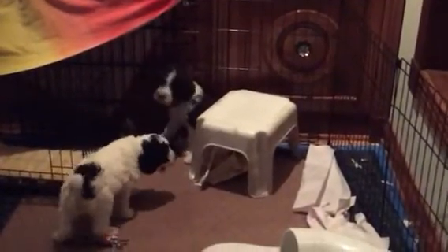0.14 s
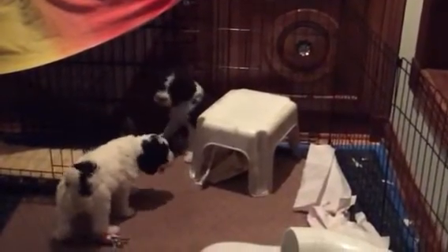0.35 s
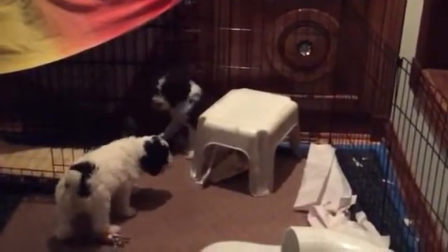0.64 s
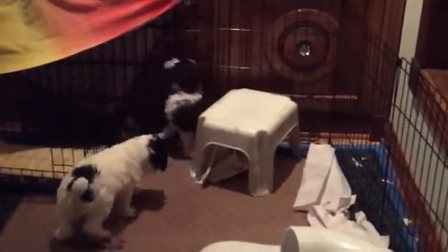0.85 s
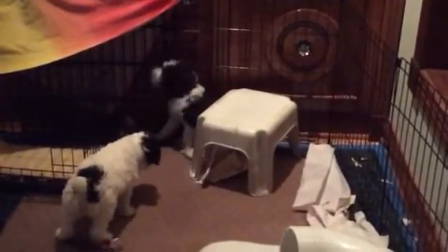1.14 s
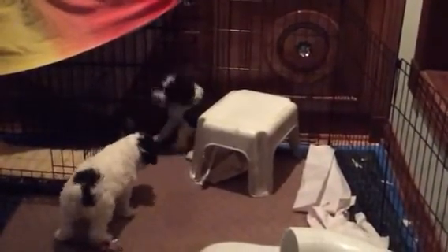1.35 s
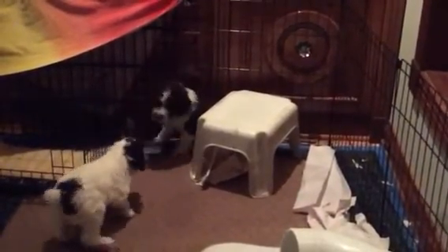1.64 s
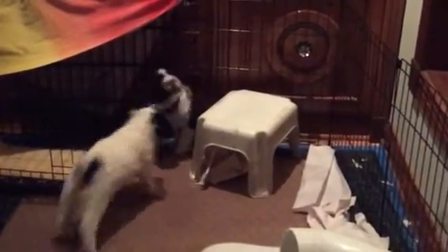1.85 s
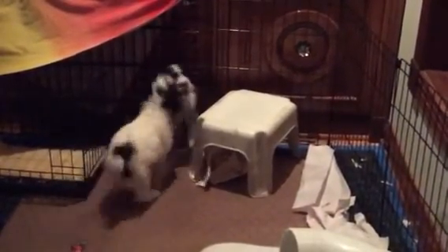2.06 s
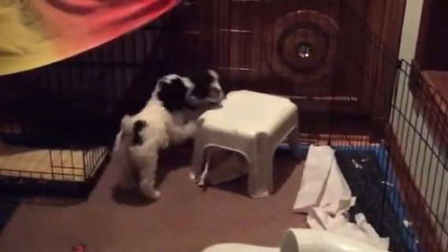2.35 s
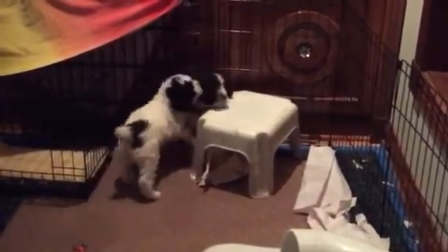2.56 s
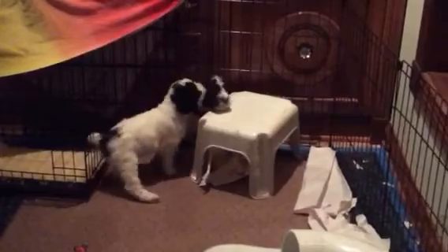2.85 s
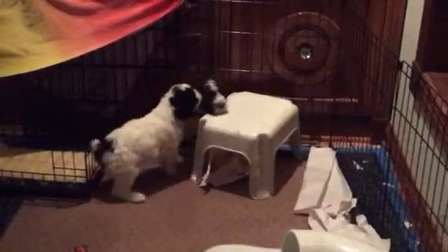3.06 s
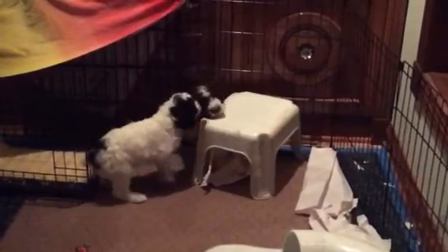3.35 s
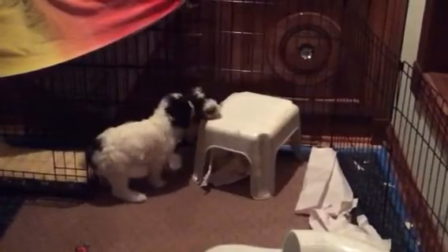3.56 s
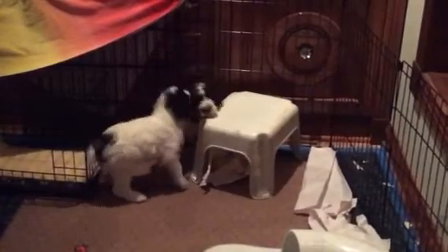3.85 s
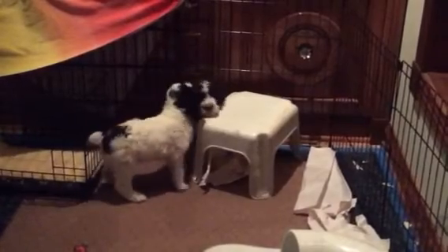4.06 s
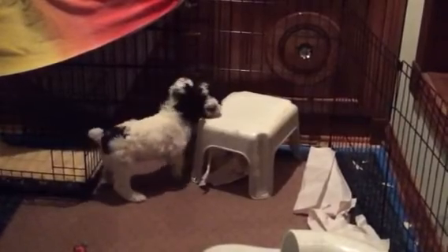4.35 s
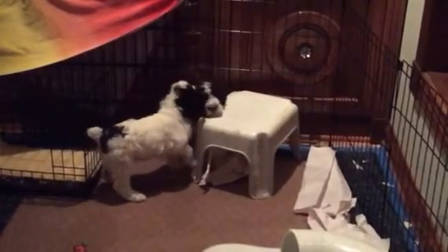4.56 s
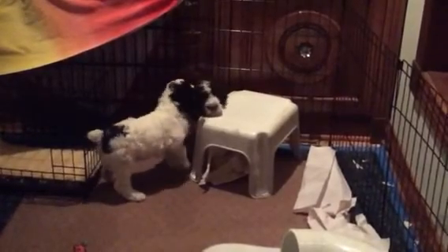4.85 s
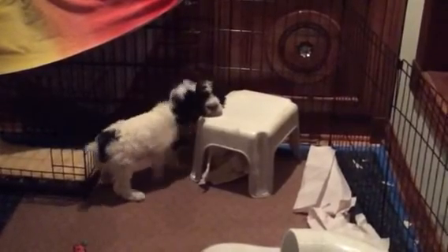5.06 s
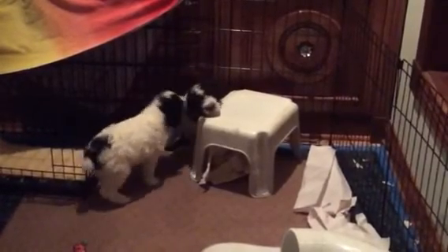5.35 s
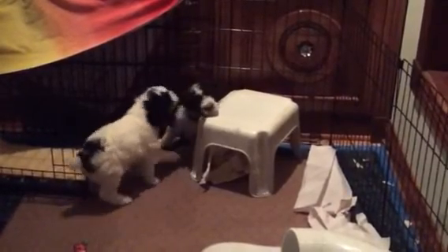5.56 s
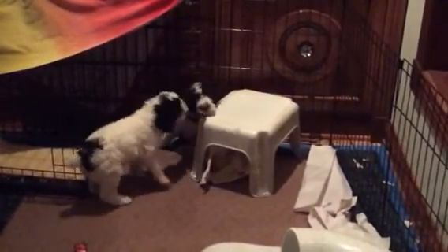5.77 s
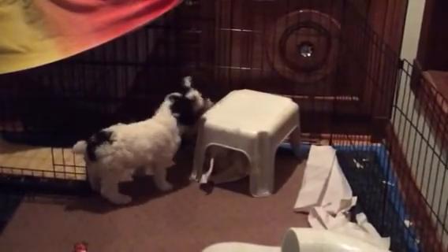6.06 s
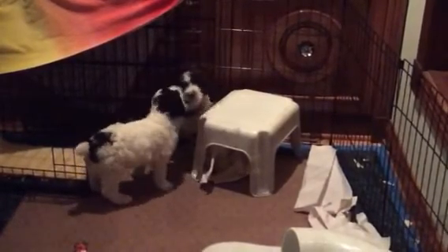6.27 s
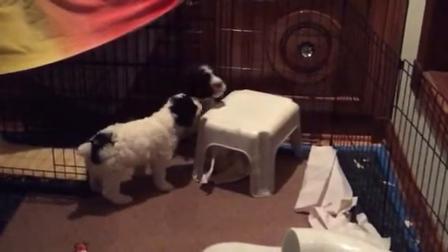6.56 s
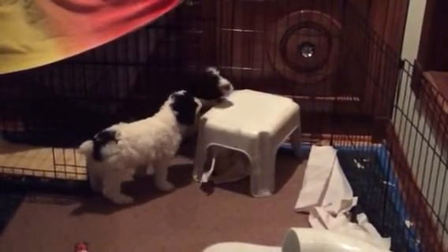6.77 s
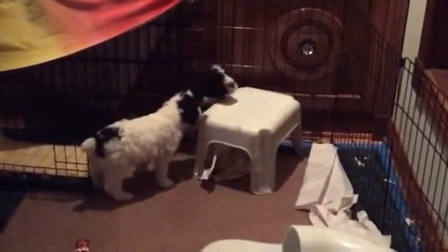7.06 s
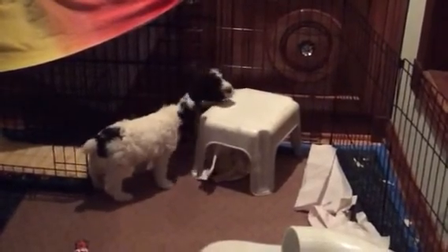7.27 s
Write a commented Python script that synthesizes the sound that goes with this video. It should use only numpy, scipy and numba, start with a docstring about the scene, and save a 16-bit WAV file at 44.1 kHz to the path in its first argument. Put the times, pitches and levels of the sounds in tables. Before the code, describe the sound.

A quiet living room with soft air noise and very faint mains hum. A tiny ring of pen wire and light claw ticks open the scene. At about 0.7 s a puppy gives a snarling bark of roughly 0.3 s, high and clear at first, then falling and turning ragged. Faint squeaky whimpers follow near 1.4-1.6 s. Claws tick, paws thump softly and fur brushes the mat from 1.7 s, with a grunt at 2.1 s and a short, rough, open-mouthed yap at 2.25 s running into a growl. Low fluttering growls come at 3.0, 3.5 and 4.1 s, with soft paw thumps near 3.9 s. Small grunts continue from 4.5 s, a faint whine at 5 s, a growl at 5.3 s. Brushing and another whine surround 6 s; growls return at 6.4 s and at the end near 7.4 s. Short indoor echo throughout.

```python
"""Two small puppies play in a wire pen in a living room; the microphone hears a quiet background throughout.
Claw ticks (noise bursts) and a long snarling bark come early; ticks, faint whimpers (gliding tones)
and faint ringing of the pen wire are scattered throughout. Short grunts, mat brushing and soft paw thumps
follow the bark; a sharp yap leads into low growls. Barks are fold pulses through mouth resonances; grunts and
growls are slow, uneven fold flaps that ring throat and half-open mouth. A short room echo carries them."""
import sys
import numpy as np
from scipy import signal
from scipy.fft import rfft, irfft, next_fast_len
from scipy.io import wavfile
from scipy.ndimage import uniform_filter1d
from numba import njit

SR = 44100
rng = np.random.default_rng(int(sys.argv[2]) if len(sys.argv) > 2 else 0)


def to_wav(s):
    """Save 16-bit WAV."""
    ch = np.atleast_2d(s).T  # columns
    pcm = np.round(np.clip(ch, -1, 1) * 32767)  # PCM
    wavfile.write(sys.argv[1], SR, pcm.astype(np.int16))


N = 327206
T = np.arange(N) / SR


def amp(db):
    """Decibels to gain."""
    return 10 ** (np.asarray(db) / 20)


def unit(x):
    """Scale to rms 1."""
    return x / np.sqrt(np.mean(x ** 2) + 1e-20)


def even(x, span_s):
    """Hold the running rms near 1."""
    size = max(int(span_s * SR), 2)
    power = uniform_filter1d(uniform_filter1d(x ** 2, size), size)
    return x / np.sqrt(np.abs(power) + 1e-20)


def follow(rows, t):
    """The columns of a curve at times t."""
    s, *columns = np.transpose(rows)
    return [np.interp(t, s, c) for c in columns]


def gate(t, attack_s, release_s):
    """Open over the attack, hold, close over the release."""
    return np.clip(np.minimum((t - t[0]) / attack_s, (t[-1] - t) / release_s), 0, 1)


def add(out, start_s, x):
    """Mix a sound in at its start time."""
    i = int(start_s * SR)
    x, i = x[max(-i, 0):], max(i, 0)
    out[i:i + len(x)] += x[:max(N - i, 0)]


def filtered(x, order, hz, kind="low"):
    """Butterworth low- or high-pass."""
    return signal.sosfilt(signal.butter(order, hz, kind, fs=SR, output="sos"), x)


def resonate(x, hz, width_hz):
    """Band-pass with gain 1 at the centre."""
    return signal.lfilter(*signal.iirpeak(min(hz, .45 * SR), hz / width_hz, fs=SR), x)


def tract(x, modes):
    """Parallel resonances, each passed twice for steep skirts."""
    return sum(amp(db) * resonate(resonate(x, hz, w), hz, w) for hz, w, db in modes)


@njit
def glide(x, hz, width_hz):
    """Band-pass whose centre moves."""
    y, band, low = np.empty(len(x)), 0., 0.
    for i in range(len(x)):
        g, k = np.tan(np.pi * hz[i] / SR), width_hz / hz[i]
        v = (band + g * (x[i] - low)) / (1 + g * (g + k))
        band, low, y[i] = 2 * v - band, low + 2 * g * v, k * v
    return y


def noise(colour):
    """Noise of rms 1 with a (f/Hz, level/dB) spectrum."""
    hz, db = np.transpose(colour)
    n = next_fast_len(N, True)
    gain = amp(np.interp(np.log(np.fft.rfftfreq(n, 1 / SR) + 1), np.log(hz), db))
    return unit(irfft(rfft(rng.standard_normal(n)) * gain, n)[:N])


# quiet air in the living room, spectrum shape: (f/Hz, level/dB)
HUSH = [(15, -55), (25, -26.5), (69, -8.5), (148, -11), (173, 1.5), (209, -15), (240, -0.5), (305, -14.5),
        (368, -11.5), (567, -16.5), (804, -18.5), (1340, -19), (1800, -23.5), (2300, -26), (15500, -31)]
HUSH_DB = -68
# mains hum, peak level: (f/Hz, level/dB)
HUM = [(120, -78.5), (240, -82.5)]


def background():
    """Still room air as coloured noise, with a faint mains hum of steady sines."""
    hum = sum(amp(db) * np.sin(2 * np.pi * hz * T) for hz, db in HUM)
    return amp(HUSH_DB) * noise(HUSH) + hum


# faint tones in the pen, rms ahead of the room; the wire rings near 2.1 kHz, the whimpers lie lower:
# (t/s, length/s, start f/Hz, end f/Hz, level/dB)
FAINT_TONES = [(0, 0.044, 2137, 2090, -68), (1.369, 0.076, 1850, 1735, -77),
               (1.534, 0.058, 1814, 1830, -77.5), (3.27, 0.052, 2150, 2070, -73),
               (4.946, 0.034, 1030, 1020, -67), (4.965, 0.15, 930, 864, -72.5),
               (5.98, 0.142, 950, 902, -73), (6.108, 0.12, 2060, 2070, -69.5)]
WIRE_FROM_HZ = 2000  # tones that start above this are the wire


def wavering_tones(rows, waver=0.058, flutter_db=4):
    """Thin gliding tones, uneven in pitch and level."""
    out = np.zeros(N)
    for s, length, start_hz, end_hz, db in rows:
        u = np.linspace(0, 1, int(length * SR))
        slow = uniform_filter1d(rng.standard_normal((2, SR // 2)), size=130)
        wobble, flutter = unit(slow)[:, :len(u)]
        hz = (start_hz + (end_hz - start_hz) * u) * (1 + waver * wobble)
        swell = np.sqrt(np.abs(np.sin(np.pi * u))) * amp(flutter_db * flutter)
        add(out, s, amp(db) * unit(swell * np.sin(2 * np.pi * np.cumsum(hz) / SR)))
    return out


def wire_ringing():
    """Faint ringing of the pen wire, as short wavering tones near 2.1 kHz."""
    return wavering_tones([row for row in FAINT_TONES if row[2] > WIRE_FROM_HZ])


# claws and teeth on mat, stool and wire, ahead of the contact envelope: (t/s, treble level/dB, body level/dB)
TAPS = [(.003, -68.5, -57), (0.55, -61.5, -88), (0.901, -46.5, -70), (1.044, -48.5, -78), (1.762, -65, -68),
        (1.806, -58.5, -70), (1.888, -69, -55), (2.008, -53, -55), (2.179, -50.5, -44),
        (2.184, -51.5, -46.5), (2.395, -49.5, -64), (2.418, -67, -49), (2.798, -76.5, -60),
        (3.83, -84, -73), (3.914, -81, -66), (3.972, -73, -57.5), (5.651, -79, -67), (5.853, -64, -58.5),
        (6.151, -75, -58), (6.685, -62.5, -64)]


def ticks(tick_s=.008, body_s=0.0058):
    """Claws and teeth tick: treble and body noise bands, each with its own decay."""
    out, t = np.zeros(N), T[:SR // 10]
    for s, treble_db, body_db in TAPS:
        tick = unit(tract(rng.standard_normal(len(t)), [(4200, 2000, -1), (10600, 14000, 0)]))
        body = unit(tract(rng.standard_normal(len(t)), [(1240, 1600, 0), (3330, 1100, -2.0)]))
        contact = 1.51 * (1 - np.exp(-t / 0.002))  # the claw bites in, then scrapes briefly
        treble = amp(treble_db) * tick * np.exp(-t / tick_s)
        add(out, s, contact * (treble + amp(body_db) * body * np.exp(-t / body_s)))
    return out


def folds(hz, jitter, scatter_db, limp):
    """Vocal fold pulses of uneven spacing and size, limping in threes; also the time since the last one."""
    n = len(hz)
    pulses, age, at = np.zeros(n + 1), np.zeros(n), 0.
    for k, (late, loud) in enumerate(np.clip(rng.standard_normal((n // 40, 2)), -2, 2)):
        i = int(at)
        if i >= n:
            break
        size = amp(scatter_db[i] * loud) * (1 + limp[i] * np.cos(2 * np.pi * k / 3))
        pulses[i:i + 2] += size * np.array([1 - at + i, at - i])  # placed between two samples
        age[i:] = T[:n - i]
        at += SR / hz[i] * np.exp(jitter[i] * late)
    return pulses[:n], age


def rasp(pulses, puff_s):
    """A puff of turbulent air after each pulse, of the same energy as the pulse."""
    keep = np.exp(-1 / (puff_s * SR))
    puffs = signal.lfilter([np.sqrt(1 - keep ** 2)], [1, -keep], pulses)
    return puffs * rng.standard_normal(len(pulses))


FOLD_SCATTER_DB = 4.5  # at full roughness
# the gap under the fundamental: its place as a share of the pitch, and its width
DARK_SHARE, DARK_WIDTH_HZ = .56, 170
BARK_ATTACK_S, BARK_RELEASE_S = .015, .006


def bark(effort, pitch, mouth, jitter, air, lip_db, lip_width_hz, hiss_db, bright_hz):
    """A pressed voice of varying roughness rings fixed mouth modes and a moving lip resonance."""
    t = T[int(effort[0][0] * SR):int(effort[-1][0] * SR)]
    db, bright_db = follow(effort, t)
    hz, rough, lip_hz = follow(pitch, t)
    pulses, _ = folds(hz, jitter * rough, FOLD_SCATTER_DB * rough, np.clip(.8 * rough, 0, .55))
    puffs = filtered(rasp(pulses, 0.00049), 1, 900, "high")
    source = pulses + air * rough * puffs
    # dark under a clear voice
    source = source - (1 - rough ** 2) * glide(source, DARK_SHARE * hz, float(DARK_WIDTH_HZ))
    lips = glide(glide(source, lip_hz, float(lip_width_hz)), lip_hz, float(lip_width_hz))
    voice = filtered(tract(source, mouth) + amp(lip_db) * lips, 8, 5600)
    low = signal.sosfiltfilt(signal.butter(2, bright_hz, fs=SR, output="sos"), voice)
    voice = even(low + amp(bright_db) * (voice - low), 0.0043)
    hiss = unit(tract(rasp(pulses, .006), [(12000, 3700, 0)]))  # air through the teeth
    out = np.zeros(N)
    envelope = gate(t, BARK_ATTACK_S, BARK_RELEASE_S) * amp(db)
    add(out, t[0], envelope * (voice + amp(hiss_db) * hiss))
    return out


# snarling bark, voice: (t/s, pitch f/Hz, roughness 0-1, lip resonance f/Hz)
SNARL_PITCH = [(.73, 345.5, 0.22, 3100), (.772, 429.5, 0.25, 3050), (.797, 402.1, 0.19, 1960),
               (.825, 358.9, 0.21, 2000), (.88, 310.2, 0.63, 1850), (.975, 274.4, 0.82, 1950),
               (1.018, 213.8, .85, 1880)]
# snarling bark, effort ahead of the pen balance: (t/s, level/dB, brightness/dB)
SNARL = [(.734, -39.5, -12), (.768, -33.5, 8), (.81, -31, 5), (.823, -24.5, 6.5), (.845, -33, 3.5),
         (.9, -34.5, 2), (.995, -34, -3), (1.015, -57, 0), (1.055, -56, -18)]
# mouth with bared teeth: (f/Hz, width of each pass/Hz, level/dB)
SNARL_MOUTH = [(295, 114, 7.5), (562, 235, 2.5), (1170, 190, 7.5), (1462, 220, 8.5), (3460, 220, -3.5),
               (3750, 310, -1), (4050, 230, -7.5)]


def snarling_bark():
    """A long bark through bared teeth: clear at first, then breaking into roughness."""
    return bark(SNARL, SNARL_PITCH, SNARL_MOUTH, jitter=.11, air=2.18,
                lip_db=1.0, lip_width_hz=290, hiss_db=-31.5, bright_hz=2290)


FLAP_HZ, FLAP_JITTER, FLAP_SCATTER_DB = 59, .14, 3
THROAT_LOW_HZ = 142  # a small body radiates no deep bass
THROAT_RISE_HZ_PER_S = 120  # the throat tightens as a growl goes on
GROWL_ATTACK_S, GROWL_RELEASE_S = 0.027, 0.019
SWELL_DB, SAG_DB_PER_S = 6.5, 52  # effort builds to its peak, then ebbs as the air runs out
NOSE_FOLLOW, MOUTH_FOLLOW = 1.5, 1.42  # dB gained per dB of effort
# nearly closed mouth: (f/Hz, width of each pass/Hz, level/dB)
GROWL_NOSE = [(345.8, 63.6, 1), (407.3, 100, 0), (599.4, 140, -1)]
# half-open mouth: (f/Hz, width of each pass/Hz, level/dB)
GROWL_MOUTH = [(1099, 220, 3), (1201, 280, 4), (1827, 200, -7.5), (2350, 92, -13.5), (3300, 760, -16),
               (4946, 840, -22.5)]


def growl(length_s, peak_s, throat_hz, throat_db, nose_db, mouth_db,
          ring_s=0.01, air=0.9, puff_s=0.0087, throat_top_hz=330):
    """Each slow fold flap sets the throat swinging anew and snaps through nose and mouth."""
    t = T[:int(length_s * SR)]
    effort_db = np.minimum(SWELL_DB * (t / peak_s - 1), SAG_DB_PER_S * (peak_s - t))
    hz = throat_hz + THROAT_RISE_HZ_PER_S * (t - peak_s)
    steady = np.ones(len(t))
    pulses, age = folds(FLAP_HZ * steady, FLAP_JITTER * steady, FLAP_SCATTER_DB * steady, 0 * steady)
    swing = np.sin(2 * np.pi * hz * age) * np.exp(-age / ring_s)
    throat = filtered(filtered(swing, 6, THROAT_LOW_HZ, "high"), 2, throat_top_hz)
    snap = pulses + air * rasp(pulses, puff_s)
    layers = [(throat, throat_db + effort_db - 1.5),
              (tract(snap, GROWL_NOSE), nose_db + NOSE_FOLLOW * effort_db),
              (tract(snap, GROWL_MOUTH), mouth_db + MOUTH_FOLLOW * effort_db - 3)]
    voice = sum(amp(db) * even(x, 0.0182) for x, db in layers)
    return gate(t, GROWL_ATTACK_S, GROWL_RELEASE_S) * voice


# short grunts, ahead of the growl's layer balance:
# (t/s, length/s, throat f/Hz, throat level/dB, mouth level/dB)
GRUNTS = [(.995, 0.041, 195, -49, -63), (2.06, 0.067, 169, -48.5, -54), (2.225, 0.029, 194, -37.5, -67),
          (2.724, 0.027, 184, -50.5, -73.5), (3.786, 0.041, 177, -55.5, -63),
          (4.516, 0.066, 178.7, -55, -79), (4.816, 0.064, 170, -54.5, -79), (5.107, 0.055, 172.4, -54, -79),
          (5.64, 0.099, 169, -57.5, -62.5)]
GRUNT_PEAK_SHARE, GRUNT_NOSE_DB = 0.51, -11.5  # where effort peaks; nose setting against throat setting


def grunts():
    """Short growls that swell and die within a few flaps."""
    out = np.zeros(N)
    for s, length, hz, throat_db, mouth_db in GRUNTS:
        nose_db = throat_db + GRUNT_NOSE_DB
        add(out, s, growl(length, GRUNT_PEAK_SHARE * length, hz, throat_db, nose_db, mouth_db))
    return out


# paws and fur on the mat: (t of firmest contact/s, rise/s, fall/s, level/dB)
BRUSHING = [(1.33, 0.079, 0.22, -74.5), (2, 0.29, 0.3, -57.5), (2.4, 0.041, 0.14, -59),
            (2.746, 0.067, 0.18, -70), (3.921, .22, 0.23, -74.5), (5.94, 0.37, 0.2, -64.5),
            (6.48, 0.19, 0.12, -72), (6.78, .22, 0.96, -74.5), (7.42, 0.2, .1, -67)]
# brushing spectrum shape: (f/Hz, level/dB)
BRUSH_COLOUR = [(180, -37), (300, -6.5), (360, -13), (397, -18.5), (835, -9), (907, 0.5), (1810, -5.5),
                (2210, -3.5), (14500, -14), (15500, -16.5)]
# a stroke is this much weaker one rise before and one fall after its firmest contact
BRUSH_FADE_DB = 21.5


def brushing(grain_db=3.0):
    """Paws and fur brush the mat: coloured noise in random grains of 50 samples, under slow strokes."""
    grains = np.repeat(rng.exponential(size=N // 50 + 1), 50)[:N]
    brush = noise(BRUSH_COLOUR) * unit(amp(grain_db * grains))
    out = np.zeros(N)
    for s, rise_s, fall_s, db in BRUSHING:
        away = np.maximum((s - T) / rise_s, (T - s) / fall_s)
        out += amp(db - BRUSH_FADE_DB * np.minimum(away, 2) ** 2) * brush
    return out


def whimpers():
    """Hoarse gliding tones through the nose: the lower rows of FAINT_TONES."""
    return wavering_tones([row for row in FAINT_TONES if row[2] <= WIRE_FROM_HZ])


# paws landing on the padded floor, ahead of the thud envelope: (t/s, level/dB)
THUMPS = [(1.696, -67.5), (1.744, -71), (1.902, -70.5), (3.87, -60), (3.947, -63)]


def thumps(thump_hz=105, thump_s=0.03):
    """Soft paw landings: a decaying low tone with a band of noise."""
    out, t = np.zeros(N), T[:SR // 10]
    for s, db in THUMPS:
        thud = np.sin(2 * np.pi * thump_hz * t) + unit(resonate(rng.standard_normal(len(t)), 220, 160))
        add(out, s, amp(db) * thud * np.exp(-t / thump_s) * (1 - np.exp(-t / 0.0016)))
    return out


# yap, voice: (t/s, pitch f/Hz, roughness 0-1, lip resonance f/Hz)
YAP_PITCH = [(2.236, 199.6, 0.49, 2680), (2.26, 227.9, 0.65, 2720), (2.28, 250.4, 0.59, 2649),
             (2.31, 315.2, 0.3, 2300), (2.38, 231, 0.52, 2100)]
# yap, effort ahead of the pen balance: (t/s, level/dB, brightness/dB)
YAP = [(2.234, -40, -2.5), (2.259, -24.5, -1), (2.275, -22.7, 7), (2.302, -35, -12), (2.33, -37, -12),
       (2.38, -51.5, -19.5)]
# wide open mouth: (f/Hz, width of each pass/Hz, level/dB)
YAP_MOUTH = [(262, 400, -13), (619.4, 87, -8), (394, 39, -12.5), (1138, 184, 1.5), (1499, 342, 3.5),
             (3180, 230, -9.5), (4080, 480, -7.5), (4730, 230, -8.5), (5140, 320, -19.5)]


def sharp_yap():
    """A short, rough bark through a wide open mouth."""
    return bark(YAP, YAP_PITCH, YAP_MOUTH, jitter=.14, air=1.2,
                lip_db=-7.5, lip_width_hz=440, hiss_db=-31, bright_hz=2300)


# growls, ahead of the growl's layer balance:
# (t/s, length/s, time to full effort/s, throat f/Hz, throat level/dB, nose level/dB, mouth level/dB)
GROWLS = [ (2.383, 0.12, 0.061, 194, -39, -50.5, -40), (2.978, 0.301, 0.082, 191.6, -41, -58.5, -47.5),
          (3.456, 0.22, 0.041, 184.3, -42.5, -58.5, -52), (4.036, 0.111, 0.033, 179, -45.5, -67, -70.5),
          (4.122, 0.13, 0.085, 189, -45.5, -61, -59.5), (5.31, 0.11, 0.067, 191, -40.5, -61.5, -50),
          (6.368, 0.19, 0.15, 199.4, -43, -56, -53.5), (7.369, 0.088, 0.041, 176, -39.5, -62, -50.5), ]


def growls():
    """Longer growls, each with its own time to full effort."""
    out = np.zeros(N)
    for s, *settings in GROWLS:
        add(out, s, growl(*settings))
    return out


# floor, stool and door, ahead of the bass loss: (delay t/s, gain)
ECHOES = [(.0023, 0.2), (.0052, 0.33), (0.0133, 0.27), (0.0169, .22), (.0245, 0.26)]
# room tail bands: (f/Hz, t60/s, level/dB)
ROOM = [(130, 0.31, -19.5), (255.4, 0.39, -8), (536, 0.39, 0.5), (1294, 0.44, -7), (3630, 0.44, -10.5),
        (10000, 0.48, -2.5)]
# standing waves in the corner, heard as peaks and dips: (f/Hz, width/Hz, level/dB)
STANDING = [(178, 30, 1.5), (211, 18, -9), (243, 38, 3.5), (315, 24, 4), (536, 14, 4), (712, 14, 3),
            (850, 120, -4), (1368, 18, 3), (1455, 20, 4), (1550, 20, 4), (1697, 18, 6), (1778, 20, 3),
            (2045, 60, 4), (2320, 120, -5), (2599, 18, 7), (3970, 30, 4), (4638, 27, 4)]


def room(x, onset_s=0.00875):
    """Direct sound and near surfaces answer first, then a diffuse tail in bands; standing waves colour all."""
    t = T[:int(.8 * SR)]
    hz = np.log(np.fft.rfftfreq(len(t), 1 / SR) + 1)
    band_hz = np.log([row[0] for row in ROOM])
    diffuse, response = rfft(rng.standard_normal(len(t))), np.zeros(len(t))
    for share, (_, t60, db) in zip(np.eye(len(ROOM)), ROOM):
        band = irfft(diffuse * np.interp(hz, band_hz, share), len(t))
        decay = np.exp(-np.log(1000) * t / t60) * (1 - np.exp(-t / onset_s))
        response += amp(db) * band * decay / np.linalg.norm(decay)
    early = np.zeros(len(t))
    for s, gain in ECHOES:
        early[int(s * SR)] += gain
    response += filtered(early, 1, 450, "high")  # small surfaces let the bass pass
    response[0] += 1  # direct sound
    for mode_hz, width_hz, db in STANDING:
        response = response + (amp(db) - 1) * resonate(response, mode_hz, width_hz)
    return signal.fftconvolve(x, response)[:N]


def scene():
    """Both puppies in the pen, heard through the room, over the background."""
    contacts = wire_ringing() + ticks() + brushing() + thumps()
    voices = amp(-2.5) * snarling_bark() + amp(-0.5) * sharp_yap() + amp(-0.15) * (grunts() + growls())
    return (room(contacts + voices + whimpers()) + background())[None]


TOP_HZ = 15400


def record(dry):
    """The microphone's top is cut steeply by an elliptic low-pass."""
    return signal.sosfilt(signal.ellip(10, .2, 70, TOP_HZ, fs=SR, output="sos"), dry)


dry = scene()
out = record(dry)
to_wav(out)
```